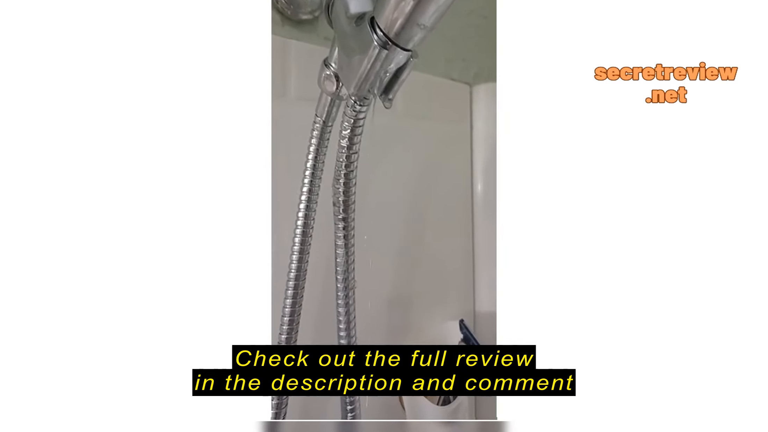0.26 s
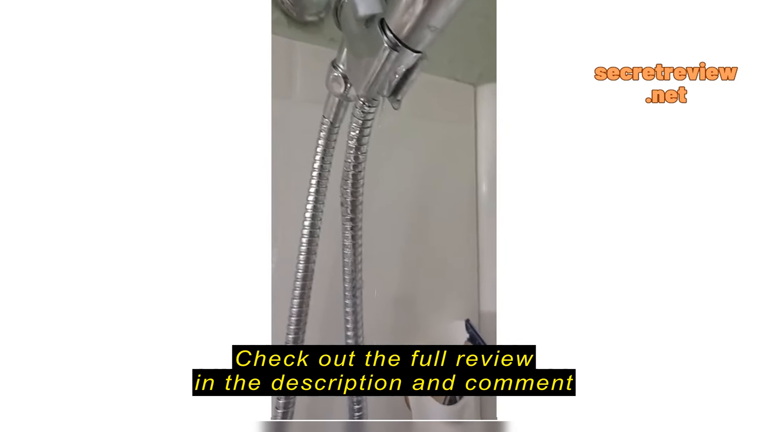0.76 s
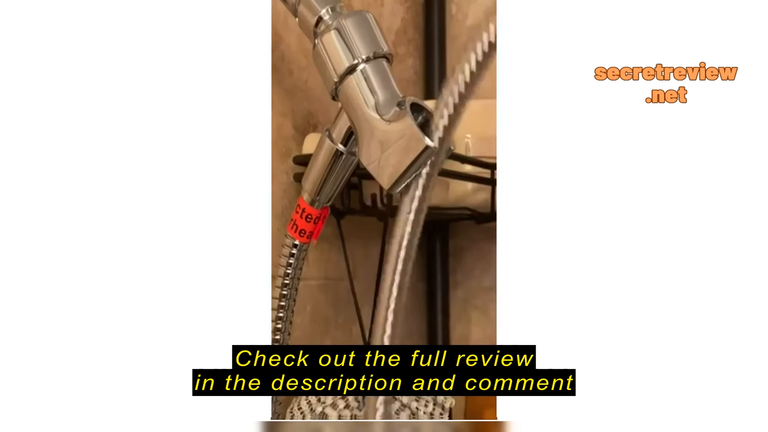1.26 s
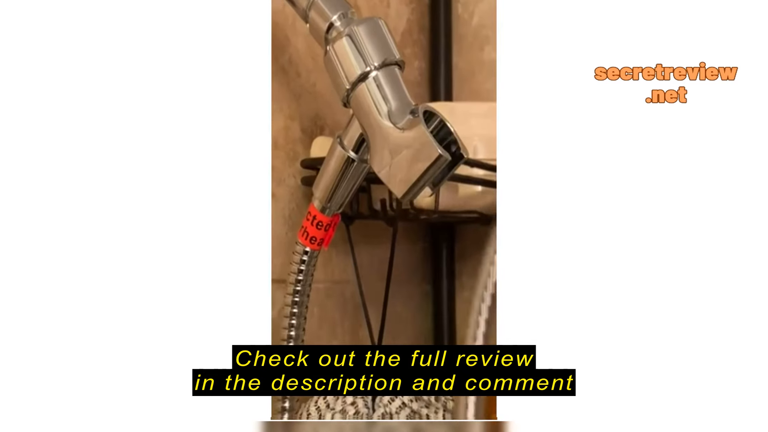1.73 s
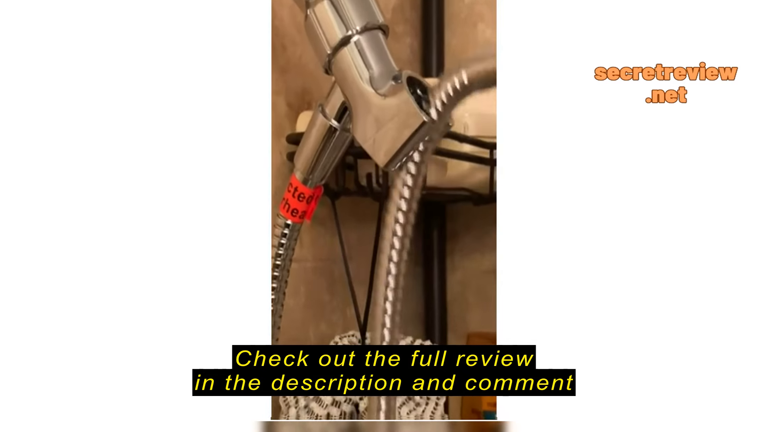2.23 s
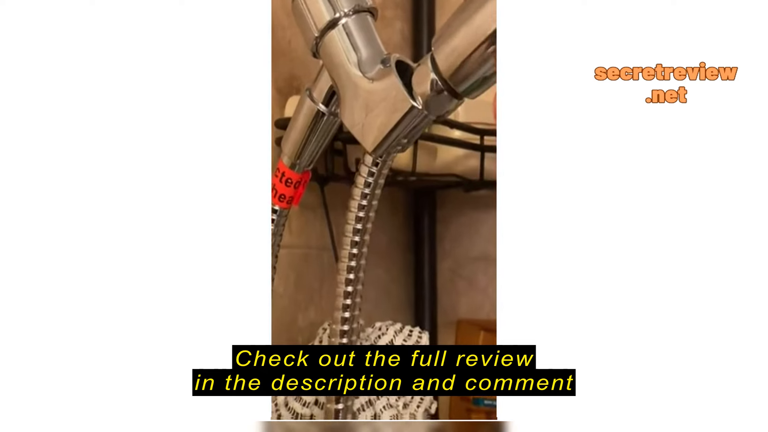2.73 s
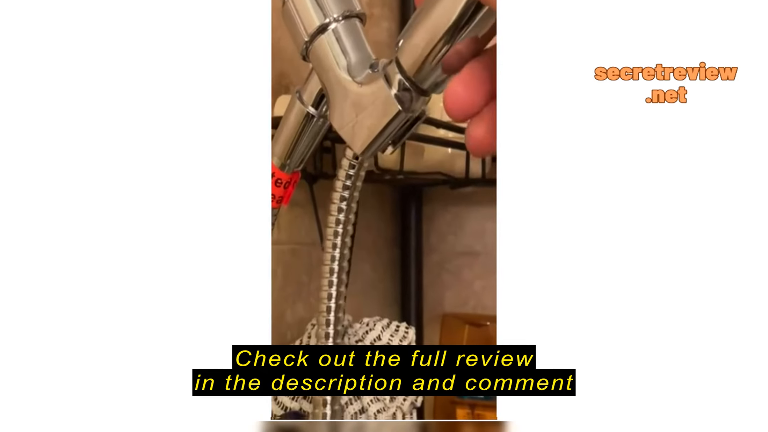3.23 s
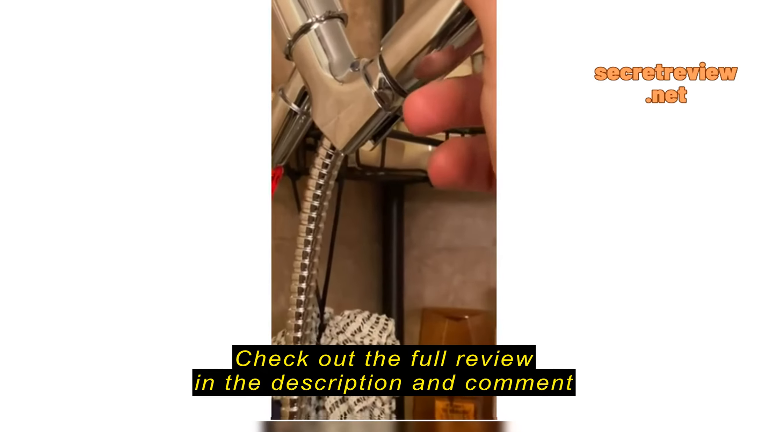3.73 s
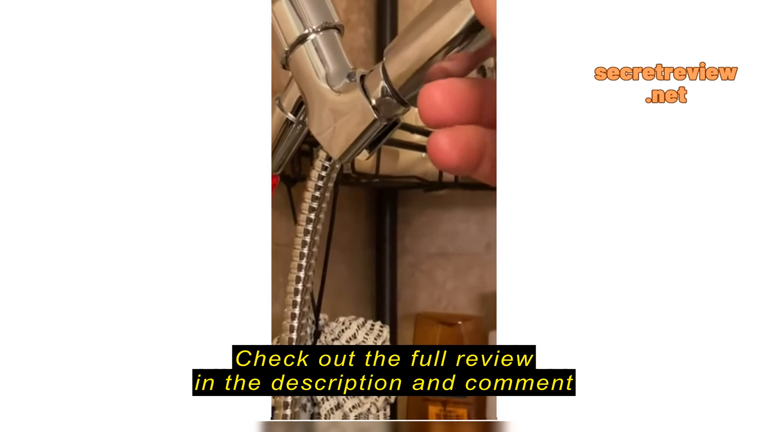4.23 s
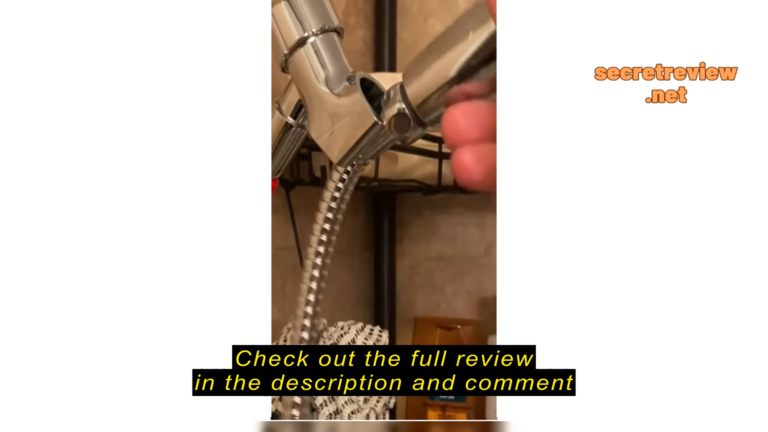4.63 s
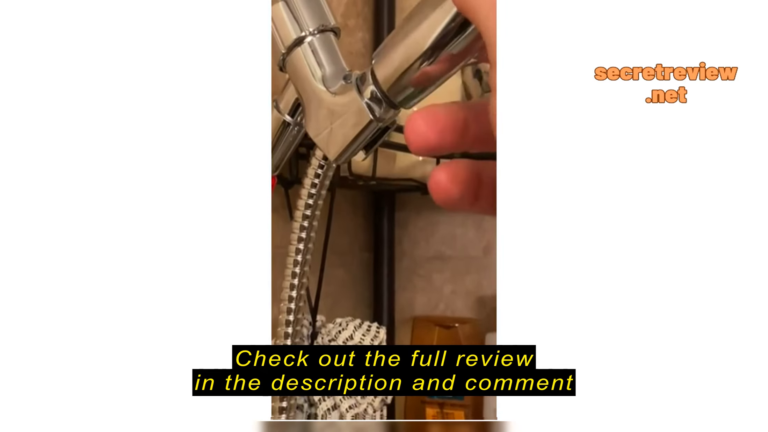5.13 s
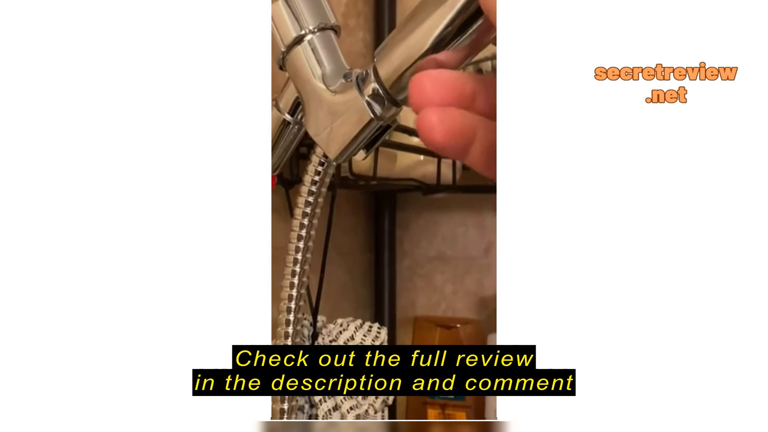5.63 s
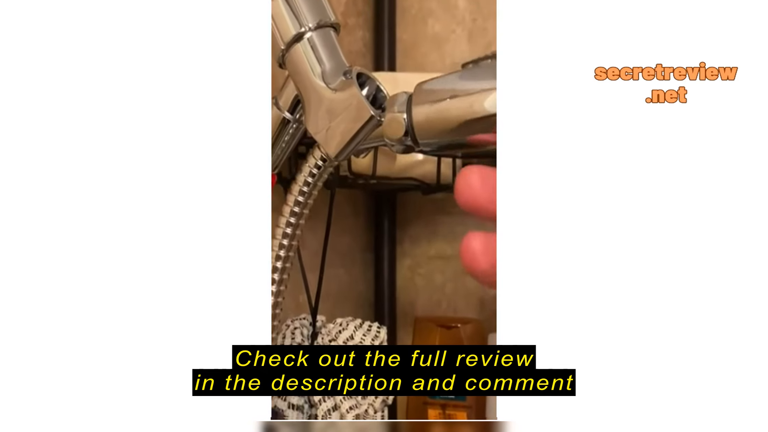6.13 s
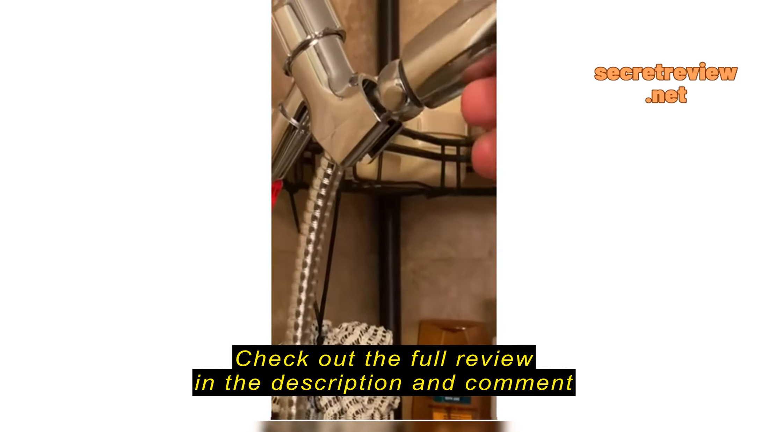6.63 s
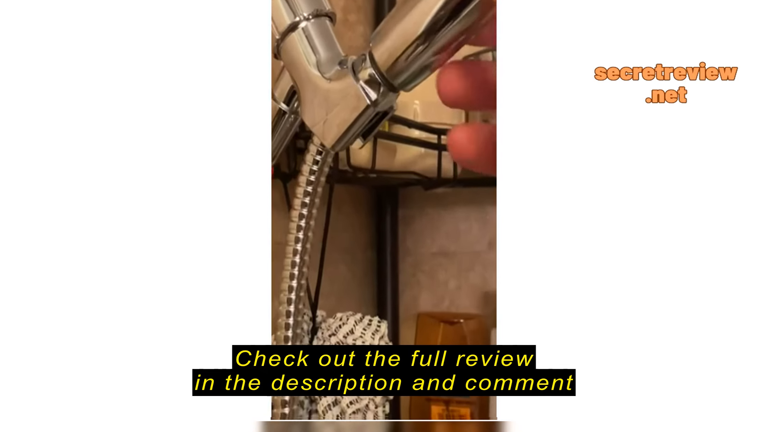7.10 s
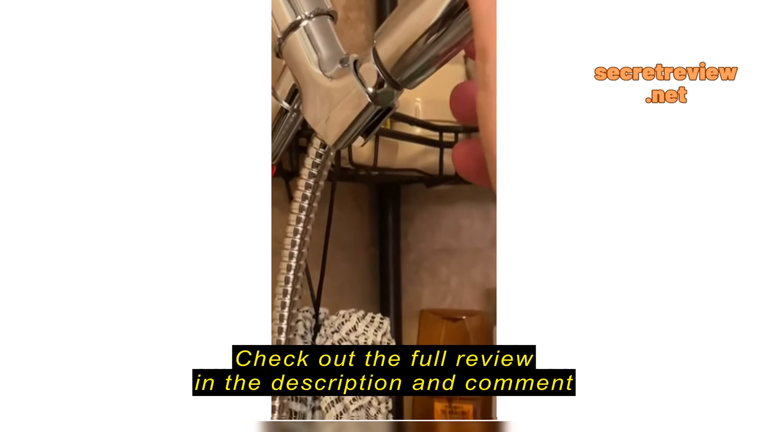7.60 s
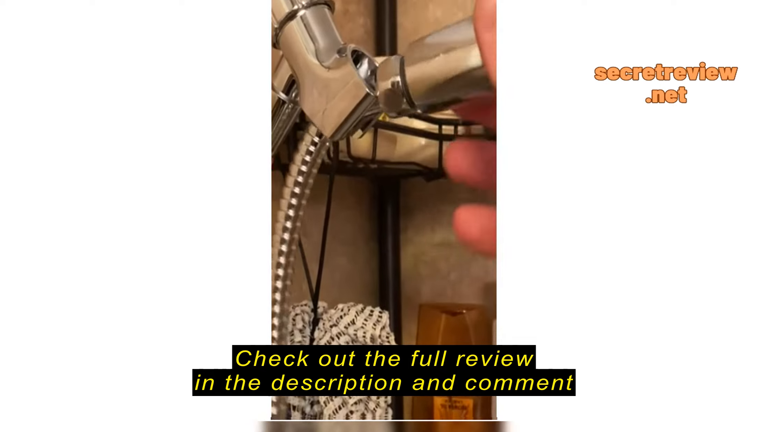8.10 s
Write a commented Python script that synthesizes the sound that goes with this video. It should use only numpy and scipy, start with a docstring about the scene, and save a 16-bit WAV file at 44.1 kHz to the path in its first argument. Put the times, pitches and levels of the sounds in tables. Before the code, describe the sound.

A dense, bright shower spray patters into a tub for under a second, opening with a quick metal clack on the right, then cuts off sharply. In a quiet tiled bathroom with faint low ventilation, a metal hose rasps briefly, light taps follow, and a hollow chromed plastic shower head docks and undocks with clicks, rubs and dull wall thumps. Close stereo microphones.

```python
"""A hand-held shower head is pulled from its bracket and docked again and again in a small tiled bathroom:
bursts of noise and struck modes make the chromed plastic clicks, rubs and thumps on the shower arm.
Before that, drops of filtered noise spray into a tub, with a metal clack at the start, until the sound is cut.
After a short silence a low ventilation rumble of coloured noise is heard; its level holds, then slowly rises.
Two microphones hear the room: lows much alike on both sides, most highs less so."""
import sys
import numpy as np
from scipy import signal
from scipy.fft import rfft, irfft, next_fast_len
from scipy.io import wavfile
from scipy.ndimage import uniform_filter1d

SR = 44100
rng = np.random.default_rng(int(sys.argv[2]) if len(sys.argv) > 2 else 0)


def inscribe(sig):
    """Save sig as 16-bit PCM at rate SR to the path in sys.argv[1].

    A 1-D sig is mono; a 2-D sig holds one channel per row.
    Samples are clipped to [-1, 1] before scaling.
    """
    pcm = np.round(np.clip(np.atleast_2d(sig).T, -1, 1) * 32767)
    wavfile.write(sys.argv[1], SR, pcm.astype(np.int16))


N = 368676
TIME = np.arange(N) / SR   # seconds


def from_db(db):
    """Turns decibels into an amplitude factor."""
    return 10 ** (np.asarray(db) / 20)


def rms_one(x):
    """Scales a sound to rms 1 over all its channels."""
    return x / np.sqrt(np.mean(x ** 2) + 1e-20)


def in_time(rows):
    """A curve over time joined by straight lines."""
    return np.interp(TIME, *np.transpose(rows))


def at_hz(points, hz):
    """A spectrum read on a log-frequency axis."""
    points = np.array(points)
    return np.interp(np.log(np.maximum(hz, 1)), np.log(points[:, 0]), points[:, 1])


def high_pass(x, hz):
    """Takes the lows away below a corner frequency."""
    return signal.sosfilt(signal.butter(2, hz, "high", fs=SR, output="sos"), x)


def colour(x, spectrum):
    """Gives a steady noise its spectrum; rms 1."""
    length = x.shape[-1]
    size = next_fast_len(length)
    hz = np.arange(size // 2 + 1) * SR / size
    shaped = irfft(rfft(x, size) * from_db(at_hz(spectrum, hz)), size)
    return rms_one(shaped[..., :length])


def diffuse(size, likeness):
    """White stereo noise whose two sides are alike by a share that depends on frequency."""
    padded = next_fast_len(size)
    mid, side = rfft(rng.standard_normal((2, padded)))
    hz = np.arange(len(mid)) * SR / padded
    alike = np.clip(at_hz(likeness, hz), -1, 1)
    left_right = np.sqrt(1 + alike) * mid + np.sqrt(1 - alike) * side * [[1], [-1]]
    return rms_one(irfft(left_right, padded)[:, :size])


def resonate(x, resonances):
    """Parallel resonances, each at its own rms level."""
    total = 0
    for hz, width, db in resonances:
        without_highs = signal.sosfilt(signal.butter(2, 2 * hz, fs=SR, output="sos"), x)
        peak = signal.butter(1, [hz - width / 2, hz + width / 2], "band", fs=SR, output="sos")
        total = total + from_db(db) * rms_one(signal.sosfilt(peak, without_highs))
    return total


def grains(size, per_s, spread_db):
    """Tiny impacts at random moments, of slightly varying size."""
    sizes = from_db(spread_db * np.minimum(rng.exponential(1, (2, size)), 4))
    hits = rng.random((2, size)) < per_s / SR
    return rms_one(hits * sizes * rng.choice([-1, 1], (2, size)))


def add(out, s, sound):
    """Mixes a sound in at a given time in seconds."""
    start = max(round(s * SR), 0)
    out[:, start:start + sound.shape[-1]] += sound[..., :max(N - start, 0)]


def unit_blow(x):
    """Scales a blow to the energy of 10 ms at rms 1."""
    energy = np.mean(np.sum(x ** 2, axis=-1))
    return x / np.sqrt(energy / (SR / 100) + 1e-20)


def burst(spectrum, rise_s, decay_s, width):
    """The dense, quickly dying vibration that one contact starts."""
    t = TIME[:SR // 5]
    mid, side = colour(rng.standard_normal((2, len(t))), spectrum)
    noise = mid + width * side * np.array([[1], [-1]])
    return unit_blow(noise * (1 - np.exp(-t / rise_s)) * np.exp(-t / decay_s))


def ring(modes, scatter_db, phase_spread, detune):
    """Struck modes; strength and pitch vary with the point of contact and the grip."""
    t = TIME[:SR // 5]
    total = 0
    for hz, db, t60 in modes:
        decay = from_db(db + scatter_db * rng.normal() - 60 * t / t60) * rng.choice([-1, 1])
        pitch_hz = hz * (1 + detune * rng.normal())
        phases = phase_spread * rng.normal(size=(2, 1))   # one for each microphone
        total = total + decay * np.sin(2 * np.pi * pitch_hz * t + phases)
    return unit_blow(total)


# Likeness of the two microphones in the bathroom.
# Each row: frequency in Hz, left-right likeness from 0 to 1.
ROOM_LIKENESS = [(60, 1), (130, 0.96), (290, .83), (640, 0.41), (1400, 0.32), (3100, 0.44), (7000, 0.16),
                 (15000, .05)]


def patter(size, mist, patchy_db):
    """Drops of each size come in flurries, so every band swells on its own."""
    drops = grains(size, per_s=3000, spread_db=0.5)
    spectrum = rfft(drops + mist * diffuse(size, ROOM_LIKENESS))
    hz = np.arange(size // 2 + 1) * SR / size
    band = np.round(np.log2(np.maximum(hz, 100)) * 2)   # half-octave bands
    total = 0
    for k in np.unique(band):
        smoothed = uniform_filter1d(rng.standard_normal(size), size=900)
        flurry = rms_one(uniform_filter1d(smoothed, size=400))
        total = total + irfft(spectrum * (band == k), size) * from_db(patchy_db * flurry)
    return total


# Colour of the spray at the two microphones.
# Each row: frequency in Hz, relative left level in dB, relative right level in dB.
SPRAY = [(300, -8.5, -6.5), (650, -10, -11.5), (1180, -14.5, -11), (1780, -13.5, -6.5), (2817, -12, -13.5),
         (4540, -19, -6.5), (6500, -11, -10), (8090, -15.5, -17), (9250, -14, -7), (9900, -10, -1.5),
         (11500, -10, -5.5), (13200, -0.5, -11.5), (14800, -6, -15.5), (15100, -1.5, -18.5)]
# Resonances of the tub drummed by the water.
# Each row: frequency in Hz, width in Hz, relative level in dB.
TUB = [(93, 40, -2.5), (132, 37, -6), (182.6, 27, -6.5), (222.6, 21, -3.5), (280, 85, -9),
       (528.6, 7.7, -14.5)]
# Strength of the water flow. Each row: time in seconds, level change in dB.
FLOW = [(0, 3.5), (.1, 2), (.3, 2.5), (.6, 3.5), (.87, 0.5)]
SHOWER_CUT_S = .873   # the shower's sound is cut here


def shower(hiss_db=-29.5, tub_db=-44):
    """Drops patter in a fine mist of hiss and drum on the tub."""
    size = SR
    spray, hz = np.array(SPRAY), np.arange(size // 2 + 1) * SR / size
    gains = from_db([at_hz(spray[:, [0, 1]], hz), at_hz(spray[:, [0, 2]], hz)])
    hiss = irfft(rfft(patter(size, mist=.7, patchy_db=1.62)) * gains, size)
    hiss = rms_one(high_pass(hiss, 300))
    tub_likeness = [(80, 1.0), (150, 1.0), (230, 0.57), (300, 0.64), (550, 0.25)]   # (Hz, likeness)
    tub = resonate(diffuse(2 * size, tub_likeness), TUB)[:, size:]   # already ringing at the start
    out = np.zeros((2, N))
    add(out, 0, from_db(hiss_db) * hiss + from_db(tub_db) * tub)
    cut_db = 1400 * np.clip(TIME - SHOWER_CUT_S, 0, .1)   # falls 1400 dB per second
    return out * from_db(in_time(FLOW) - cut_db)


# Decay of the tiled bathroom. Each row: frequency in Hz, time to fall 60 dB in seconds.
ROOM_T60 = [(80, .45), (210, 0.14), (560, 0.28), (1470, 0.24), (3880, 0.085), (8000, 0.24), (15000, 0.071)]


def bathroom(x, wet_db):
    """Adds the dense reflections of close tiles, dying band by band."""
    t, tail = TIME[:SR // 2], 0
    edges = np.geomspace(40, 18000, 10)   # Hz
    for low, high in zip(edges, edges[1:]):
        band_pass = signal.butter(2, [low, high], "band", fs=SR, output="sos")
        band = signal.sosfilt(band_pass, diffuse(len(t), ROOM_LIKENESS))
        tail = tail + band * from_db(-60 * t / at_hz(ROOM_T60, np.sqrt(low * high)))
    tail = tail * np.clip(t / 0.0094, 0, 1)   # reflections build up over 9.4 ms
    tail = tail / np.sqrt(np.sum(tail ** 2) / 2)
    return x + from_db(wet_db) * signal.fftconvolve(x, tail, axes=-1)[:, :N]


# A metal fitting clacks and rebounds. Each row: start in seconds, relative level in dB.
CLACKS = [(.004, -1), (.007, -3.5), (.0095, -3.5), (0.0109, -5.5), (0.021, -9.5), (0.03, -11)]
# Ring of the fitting.
# Each row: frequency in Hz, relative level in dB, time to fall 60 dB in seconds.
FITTING_MODES = [(1890, -5.5, .06), (2640, -7, 0.053), (3530, -1, 0.1), (3480, -6.5, 0.15),
                 (3892, -2.5, 0.095), (4140, 0, 0.097), (4180, -7, .13), (4180, -2.5, 0.091),
                 (4900, -6, .08), (5230, -4.5, 0.032), (5880, -5.5, 0.065), (6470, -3.5, .05)]


def fitting(crack_db=-23, ring_db=-29, pan_db=2.5):
    """A loose metal fitting chatters for a moment, on the right: each clack is a noise crack and a ring."""
    crack_spectrum = [(800, -27), (1800, -12.5), (3000, -5.5), (3900, -0.5), (6000, -2.5), (8000, -22.5)]
    out = np.zeros((2, N))
    for s, db in CLACKS:
        crack = burst(crack_spectrum, rise_s=0.00016, decay_s=.003, width=1.0)
        rung = ring(FITTING_MODES, scatter_db=2, phase_spread=1.0, detune=0.018)
        add(out, s, from_db(crack_db + db) * crack + from_db(ring_db + db) * rung)
    return bathroom(out, wet_db=-5.0) * from_db([[-pan_db], [pan_db]])


HOLLOW_S, HOLLOW_HZ = (1.0, 1.15, 1.58, 1.7), (1000, 1350)   # fade in from, to, fade out from, to; band


def hollowed(air):
    """A narrow band drops out of the rush for a moment."""
    notch = signal.butter(2, HOLLOW_HZ, "bandstop", fs=SR, output="sos")
    notched = signal.sosfiltfilt(notch, air)
    return air + np.interp(TIME, HOLLOW_S, [0, 1, 1, 0]) * (notched - air)


# Colour of the ventilation's rush of air. Each row: frequency in Hz, relative level per Hz in dB.
AIR = [(15, -56), (25, -19), (59, -1.5), (109, 1), (131, -3), (146, -20.5), (181, -6), (264, -10),
       (301, 1.5), (404, -13.5), (488, -8.5), (1030, -19.5), (2020, -21.5), (7680, -47), (15000, -66.5)]
# The rush of air at the two microphones.
# Each row: frequency in Hz, left-right likeness (negative is opposed, held within -1 to 1).
AIR_LIKENESS = [(60, 1), (120, 0.93), (240, 0.89), (480, 0.57), (950, -0.13), (1890, 0.77), (3770, 0.86),
                (7520, 0.95), (15000, -1.3)]
# Hum of the ventilation. Each row: frequency in Hz, width in Hz, relative level in dB.
HUM = [(61, 3.4, -23.5), (121.4, 6.2, -10.5), (239.5, 3.3, -12), (300, 21, -10.5), (359, 27, -12.5)]
AIR_HEARD_S, AIR_DB = .947, -64   # heard from here on
LEVEL_RISE_S, LEVEL_RISE_DB_PER_S = 4.735, 3.8   # level steady until here, then it rises


def ventilation(air_db=2, hum_db=0):
    """A dull rush of coloured noise with a wavering hum of narrow noise bands."""
    air = from_db(air_db) * hollowed(colour(diffuse(N, AIR_LIKENESS), AIR))
    hum = from_db(hum_db) * resonate(rng.standard_normal(N), HUM)
    level_db = AIR_DB + LEVEL_RISE_DB_PER_S * np.maximum(TIME - LEVEL_RISE_S, 0)
    fade_in = np.clip((TIME - AIR_HEARD_S) / 0.0035, 0, 1)
    return (air + hum) * from_db(level_db) * fade_in


# Colour of the hollow body in a contact. Each row: frequency in Hz, relative level in dB.
BODY = [(250, -12), (480, -5.5), (800, 10.5), (1150, 6), (1450, -4), (1900, -14.5), (2800, -43),
        (8000, -70)]
# Colour of the shell's crack. Each row: frequency in Hz, relative level in dB.
SHELL = [(900, -32), (1700, 0.5), (2300, -1.5), (2900, 1.5), (3900, 0), (4900, -3.5), (6800, -8),
         (9000, -49), (14000, -44)]
# Colour of the bright snap. Each row: frequency in Hz, relative level in dB.
SNAP = [(3500, -20), (6000, -7), (7300, 0), (8600, -3), (10200, 0), (12500, -6), (14500, -6), (16000, -13)]


def clicks(touches, modes, contact_s, body_db, shell_db, ring_db, snap_db):
    """A touch joins hollow body, shell crack, mode ring and snap; a long contact softens the attack."""
    out = np.zeros((2, N))
    for s, body, shell, snap in touches:
        hollow = burst(BODY, rise_s=0.083 * contact_s, decay_s=0.0045, width=0.6)
        crack = burst(SHELL, rise_s=0.95 * contact_s, decay_s=1.08 * contact_s, width=0.11)
        rung = ring(modes, scatter_db=0.5, phase_spread=0.23, detune=0.0069)
        bright = burst(SNAP, rise_s=0.22 * contact_s, decay_s=1.02 * contact_s, width=0.98)
        add(out, s, from_db(body + body_db) * hollow + from_db(shell + shell_db) * crack
            + from_db(shell + ring_db) * rung + from_db(snap + snap_db) * bright)
    return out


def rubs(strokes, modes, ring_db, crack_db, grit_db, count=3):
    """Tiny slips at a few points of contact crackle under a swelling stroke and set the modes ringing."""
    out = np.zeros((2, N))
    for start, end, db in strokes:
        size = max(round((end - start) * SR), SR // 100)
        swell = np.sin(np.linspace(0, np.pi, size))   # rises and falls once
        for _ in range(count):
            slips = grains(size, per_s=600, spread_db=0.5) * swell / np.sqrt(count)
            struck = ring(modes, scatter_db=-2.5, phase_spread=0.22, detune=0.012)
            rung = signal.fftconvolve(slips[:1], struck, axes=-1) / np.sqrt(SR / 100)
            crack, grit = colour(slips[:1], SHELL), colour(slips, SNAP)
            add(out, start, from_db(db + ring_db) * rung)
            add(out, start, from_db(db + crack_db) * crack + from_db(db + grit_db) * grit)
    return out


# Modes of the shower head.
# Each row: frequency in Hz, relative level in dB, time to fall 60 dB in seconds.
HEAD_MODES = [(1740, -1.5, 0.02), (2276, 1.5, 0.056), (2660, 5.5, 0.026), (2695, -12, 0.042),
              (2962, 0, 0.031), (3300, -9, 0.037), (4585, 0.5, 0.023), (5800, -14, 0.03), (6430, 1, 0.016),
              (7170, 2, 0.011)]
# Light taps of chrome on the bracket, levels before each layer's trim.
# Each row: start in seconds, shell ring in dB, snap in dB.
TAPS = [(0.9775, -71, -76), (1.4222, -65, -53), (1.924, -58, -56.5), (2.0575, -62, -55.5),
        (2.1344, -55.5, -60), (2.1906, -60.5, -60.5), (3.8667, -75, -74), (4.2704, -59.5, -65),
        (4.8814, -63.5, -55.5), (5.8073, -65, -72), (5.8959, -62, -49), (5.9768, -81, -69.5),
        (6.342, -80, -66.5), (6.5024, -56.5, -57.5), (6.6226, -53, -49), (6.9417, -63.5, -71),
        (7.412, -66, -69), (8.074, -57, -50)]
# The hand leans on the head, which rubs and loads the arm; levels before each layer's trim.
# Each row: thud time in seconds, rub length in seconds, rub in dB, wall thud in dB.
PUSHES = [(1.075, 0.028, -67.5, -54.5), (1.95, .02, -74, -51.5), (2.004, 0.038, -68.5, -62),
          (2.077, 0.02, -69, -51.5), (2.344, .07, -60, -47.5), (4.137, .055, -72.5, -50.5),
          (4.294, .05, -65, -46.5), (6.467, 0.038, -65.5, -41.5), (6.627, 0.024, -62, -49),
          (7.173, 0.042, -69, -56), (8.319, 0.052, -50.5, -29)]
# The head knocks into or out of its seat; levels before each layer's trim.
# Each row: blow time in seconds, hollow body in dB, shell ring in dB, snap in dB, grinding in dB,
# wall thud in dB, arm knock in dB.
SEATINGS = [(2.4045, -56, -53, -58, -66, -47, -47), (3.1618, -43.5, -45, -45, -51.5, -35, -36),
            (4.3167, -60, -55, -66, -63.5, -52, -51), (4.6789, -37, -37, -33.5, -59, -37, -45),
            (5.705, -48, -44, -42, -49.5, -41, -41.5), (6.7455, -46, -43, -51.5, -55, -35.5, -35),
            (6.8167, -49, -57.5, -65, -61.5, -39.5, -49), (7.7757, -51, -45.5, -48.5, -56.5, -47, -39.5),
            (7.8299, -56, -53.5, -66, -64, -49, -46.5), (7.9186, -48.5, -48.5, -50, -50, -34, -38),
            (8.2468, -50, -46, -69, -60, -37, -52), (8.2785, -45, -41, -46.5, -63, -36, -60),
            (8.3441, -41, -37.5, -31.5, -43, -41, -49)]
HEAD_CONTACT_S = 0.0022   # how long the head stays in touch with the bracket
TAP_BODY_DB = -7.5   # against the shell: a tap hardly stirs the hollow body
PUSH_LEAD_S = 0.015   # the rub starts before the thud
REBOUND_S, REBOUND_DB = 0.015, -13   # the head bounces once
APPROACH_S, APPROACH_DB = .075, -20.5   # it slides in first, this much softer than it grinds
GRIND_LEAD_S, GRIND_HOLD_S = .01, 0.026   # it grinds before and after the blow


def shower_head():
    """A seating slides in, strikes, grinds and bounces once; a tap only clicks; a push only rubs."""
    touches = [(s, shell + TAP_BODY_DB, shell, snap) for s, shell, snap in TAPS]
    strokes = []
    for s, length, rub, _ in PUSHES:
        start = s - PUSH_LEAD_S
        strokes.append((start, start + length, rub))
    for s, body, shell, snap, grind, _, _ in SEATINGS:
        levels = np.array([body, shell, snap])
        touches += [(s, *levels), (s + REBOUND_S, *(levels + REBOUND_DB))]
        strokes.append((s - APPROACH_S, s, grind + APPROACH_DB))
        strokes.append((s - GRIND_LEAD_S, s + GRIND_HOLD_S, grind))
    return (clicks(touches, HEAD_MODES, HEAD_CONTACT_S, body_db=-4, shell_db=-3.0, ring_db=-3.5, snap_db=-4.5)
            + rubs(strokes, HEAD_MODES, ring_db=0.5, crack_db=-9, grit_db=-14))


# Colour of the arm's knock. Each row: frequency in Hz, relative level in dB.
KNOCK = [(110, -16), (190, -12.5), (250, -2.5), (370, -0.5), (470, -3), (650, -11.5), (1000, -45.5),
         (4000, -75)]
# Modes of the wall behind the arm.
# Each row: frequency in Hz, relative level in dB, time to fall 60 dB in seconds.
WALL_MODES = [(65, -7, 0.46), (92.7, -4.5, 0.29), (116.6, 5.5, 0.17), (133.8, 4, 0.17), (190.7, -2.5, 0.18),
              (235.4, -11.5, 0.17)]


def thumps(loads, thud_db=2, knock_db=0, swell_s=0.0088):
    """The arm knocks, then the wall behind it swells into a boom."""
    out = np.zeros((2, N))
    for s, thud, knock in loads:
        boom = ring(WALL_MODES, scatter_db=0.0, phase_spread=0.098, detune=0.041)
        boom = unit_blow(boom * (1 - np.exp(-TIME[:boom.shape[-1]] / swell_s)))
        arm = burst(KNOCK, rise_s=0.0011, decay_s=0.03, width=0.3)
        add(out, s, from_db(thud + thud_db) * boom + from_db(knock + knock_db) * arm)
    return bathroom(out, wet_db=-10.5)


ARM_LAG_S = 0.00317   # the arm answers after the blow
PUSH_KNOCK_DB = -13   # the arm's knock against the thud


def shower_arm():
    """Seatings and pushes pass their weight through the arm into the wall."""
    seated = [(s + ARM_LAG_S, thud, knock) for s, *_, thud, knock in SEATINGS]
    pushed = [(s, thud, thud + PUSH_KNOCK_DB) for s, *_, thud in PUSHES]
    return thumps(seated + pushed)


# The ribbed metal hose slides over the bracket; rib levels before scatter and each layer's trim.
# Each row: start in seconds, end in seconds, ribs per second, first rib in dB, last rib in dB.
HOSE_SLIDES = [(1.1002, 1.147, 67, -51, -45.5), (1.2553, 1.295, 43, -66.5, -63),
               (1.354, 1.385, 80, -76, -76), (2.2596, 2.39, 48.5, -60.5, -51.5)]
# Modes of the hose's ribs.
# Each row: frequency in Hz, relative level in dB, time to fall 60 dB in seconds.
HOSE_MODES = [(2250, -5, .02), (2650, -3, .025), (3400, -7, .02), (4500, -5, .02), (4830, 0, .025),
              (5140, -1, .025), (7440, -8, .02)]
RIB_CONTACT_S = .0026   # how long a rib stays in touch with the bracket
RIB_BODY_DB, RIB_SNAP_DB, RIB_RUB_DB = -21, -1, -10   # against the ring of a rib
RIB_SCATTER_DB, RIB_JITTER_S = -1.8, 0.00054   # random spread of level and time


def hose():
    """The hose rubs along the bracket, and its ribs catch one after another."""
    touches, strokes = [], []
    for start, end, ribs_per_s, first_db, last_db in HOSE_SLIDES:
        strokes.append((start, end, (first_db + last_db) / 2 + RIB_RUB_DB))
        for s in np.arange(start, end, 1 / ribs_per_s):
            db = np.interp(s, [start, end], [first_db, last_db]) + RIB_SCATTER_DB * rng.normal()
            caught_s = s + RIB_JITTER_S * rng.normal()
            touches.append((caught_s, db + RIB_BODY_DB, db, db + RIB_SNAP_DB))
    return (clicks(touches, HOSE_MODES, RIB_CONTACT_S, body_db=-2, shell_db=-7.5, ring_db=-4.0, snap_db=-7.5)
            + rubs(strokes, HOSE_MODES, ring_db=-7, crack_db=-11, grit_db=-11))


# Modes of the empty bracket.
# Each row: frequency in Hz, relative level in dB, time to fall 60 dB in seconds.
BRACKET_MODES = [(2550, -2, 0.046), (2850, 2, 0.033)]
BRACKET_EMPTY_S = (1.6, 2.3)   # from, to


def pings(ping_db=0.5):
    """With nothing seated in it, the bracket rings on after a tap."""
    out = np.zeros((2, N))
    for s, shell, _ in TAPS:
        if BRACKET_EMPTY_S[0] < s < BRACKET_EMPTY_S[1]:
            rung = ring(BRACKET_MODES, scatter_db=2.5, phase_spread=.15, detune=.004)
            add(out, s, from_db(shell + ping_db) * rung)
    return out


def scene():
    """The water, then the handling of the shower head and its hose over the ventilation."""
    handling = bathroom(shower_head() + hose() + pings(), wet_db=-6.5)
    return shower() + fitting() + ventilation() + shower_arm() + handling


CUTOFF_HZ = 15850


def record(dry):
    """The top is cut steeply by a low-pass filter."""
    return signal.sosfilt(signal.ellip(12, .1, 80, CUTOFF_HZ, fs=SR, output="sos"), dry)


dry = scene()
out = record(dry)
inscribe(out)
```